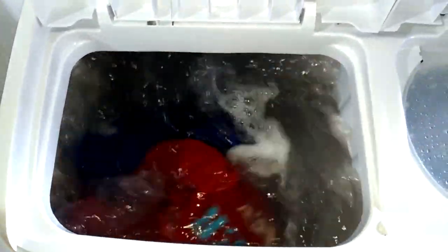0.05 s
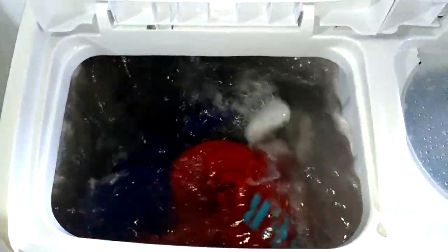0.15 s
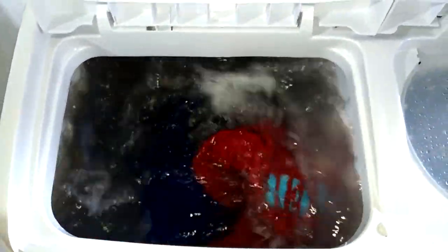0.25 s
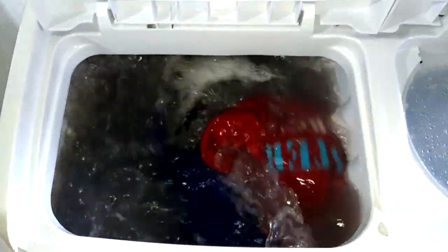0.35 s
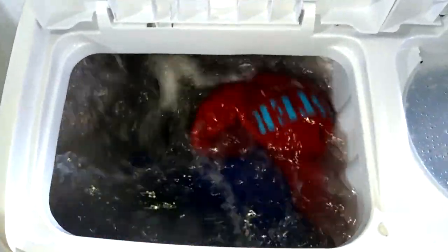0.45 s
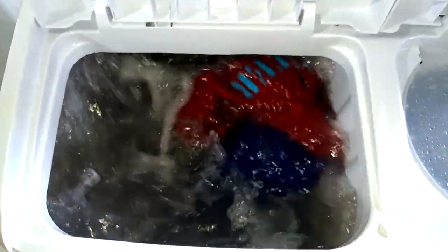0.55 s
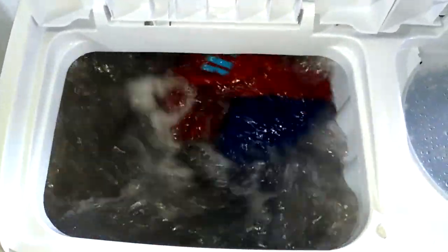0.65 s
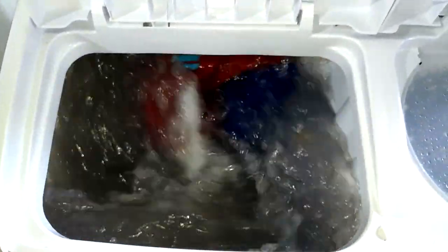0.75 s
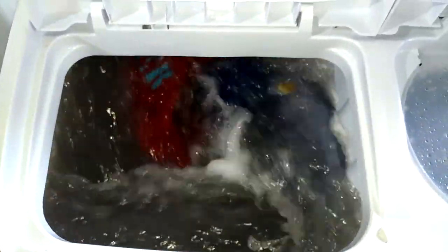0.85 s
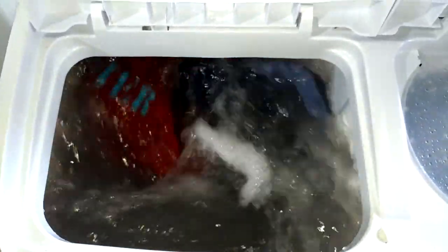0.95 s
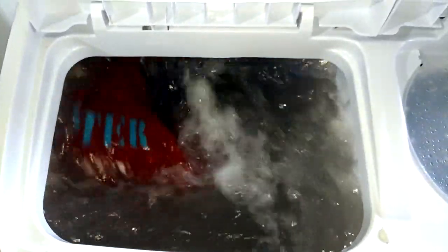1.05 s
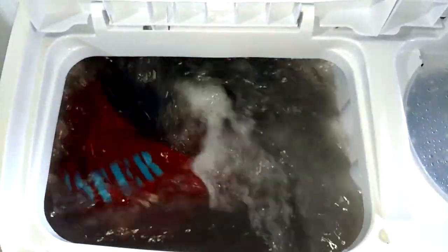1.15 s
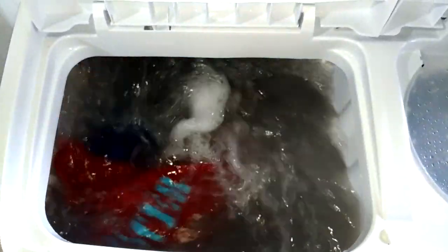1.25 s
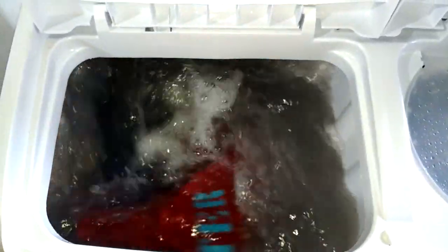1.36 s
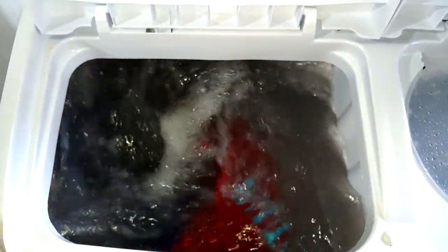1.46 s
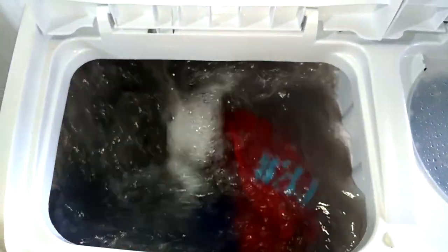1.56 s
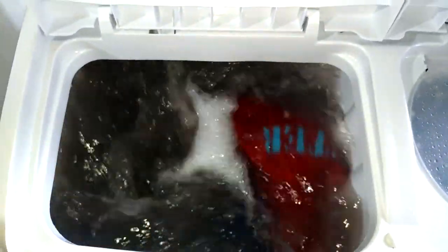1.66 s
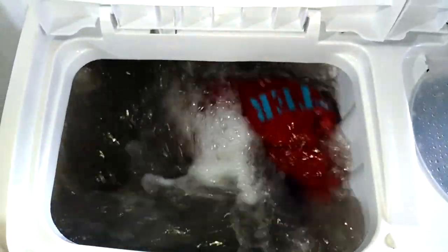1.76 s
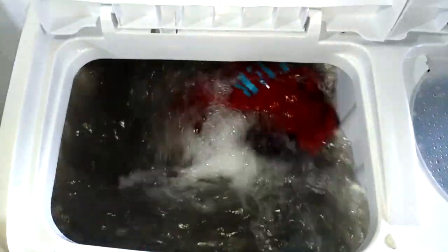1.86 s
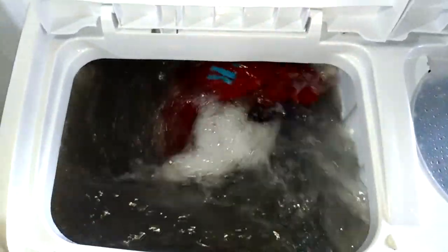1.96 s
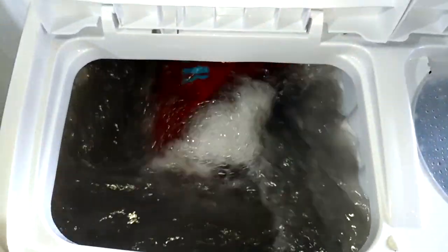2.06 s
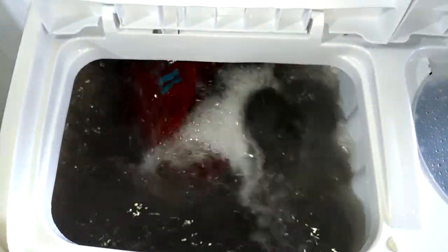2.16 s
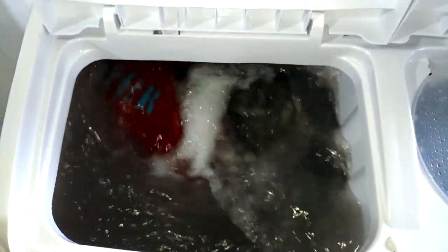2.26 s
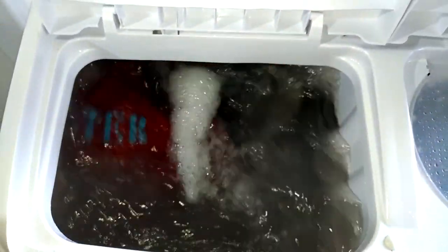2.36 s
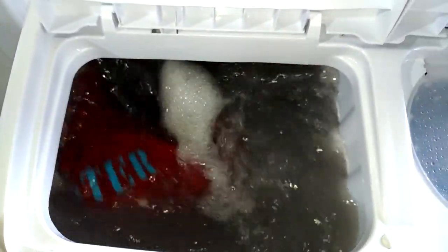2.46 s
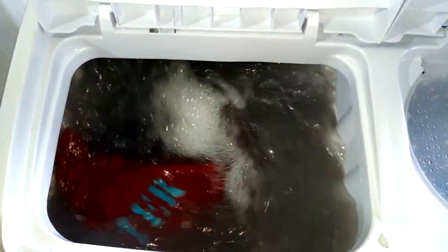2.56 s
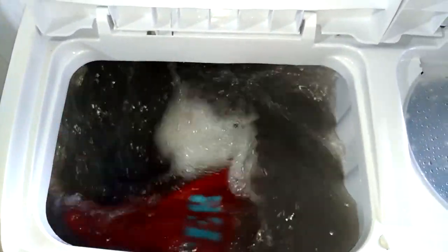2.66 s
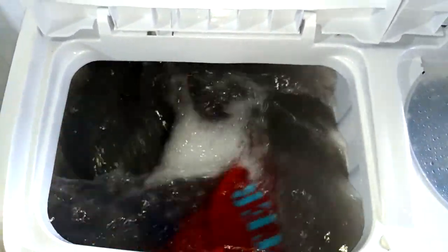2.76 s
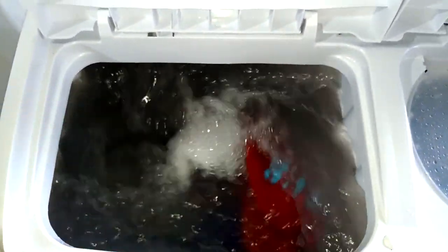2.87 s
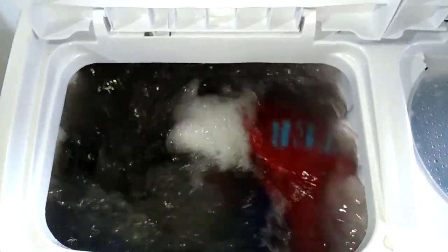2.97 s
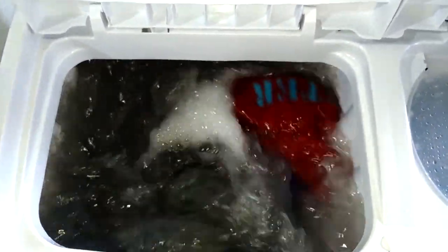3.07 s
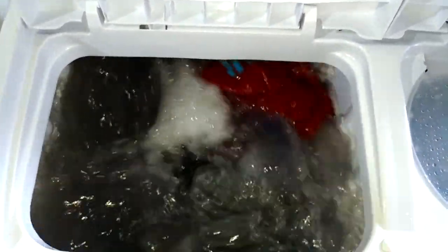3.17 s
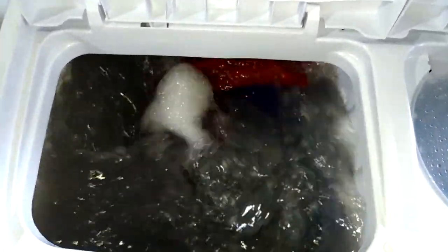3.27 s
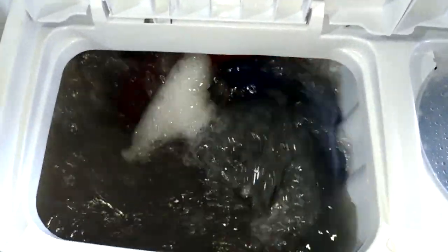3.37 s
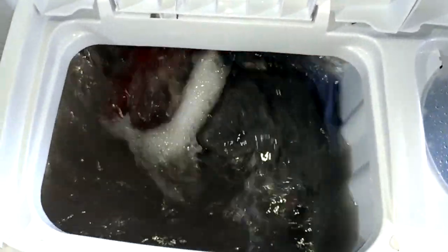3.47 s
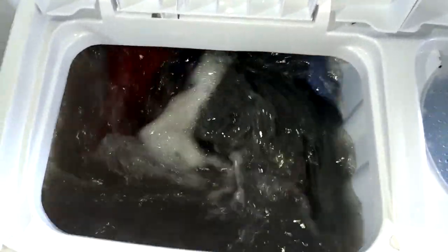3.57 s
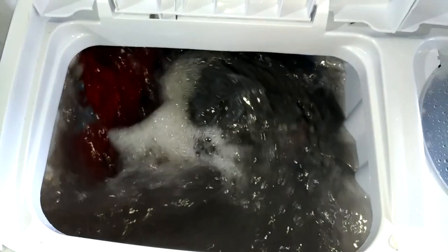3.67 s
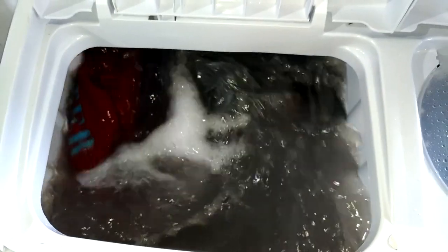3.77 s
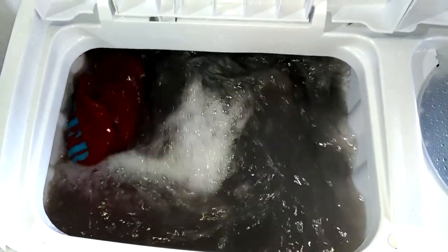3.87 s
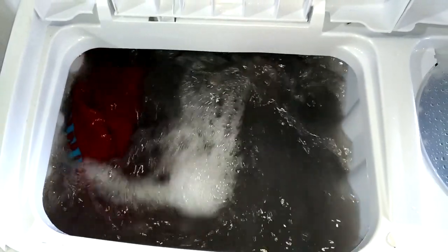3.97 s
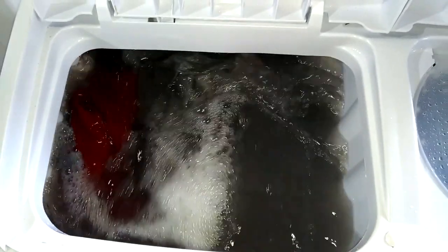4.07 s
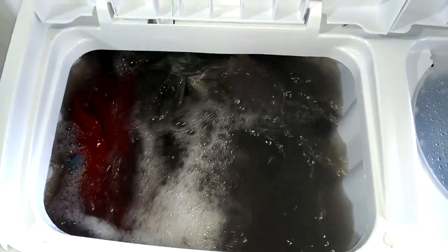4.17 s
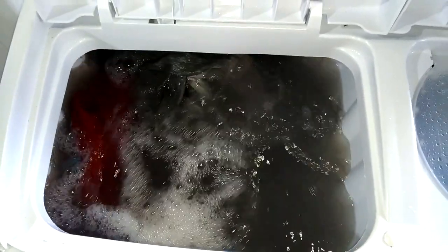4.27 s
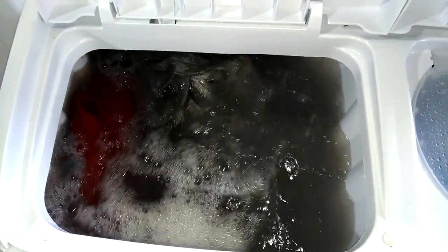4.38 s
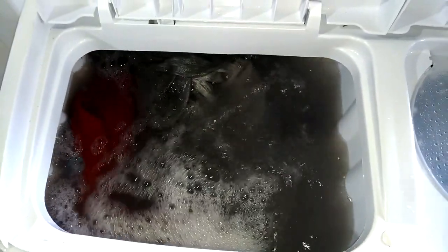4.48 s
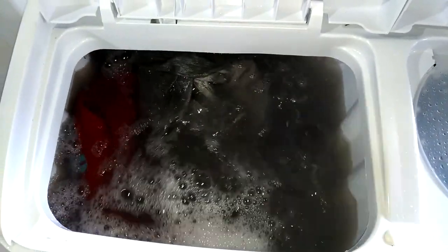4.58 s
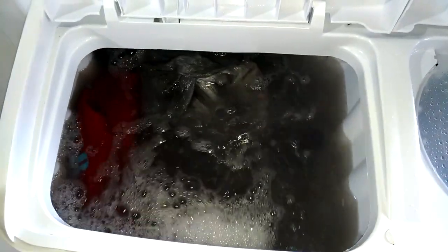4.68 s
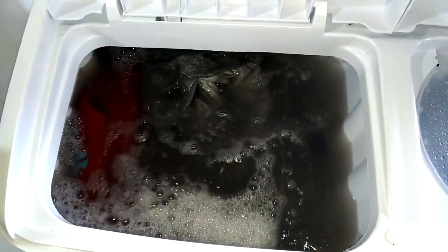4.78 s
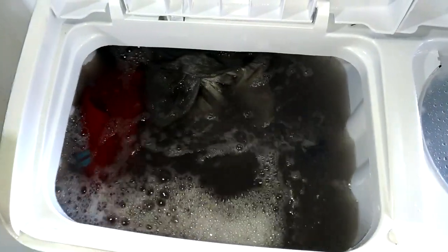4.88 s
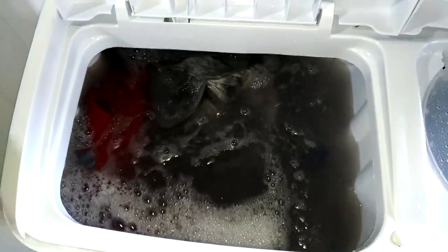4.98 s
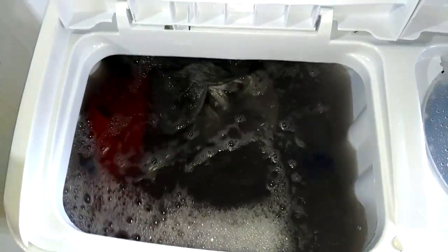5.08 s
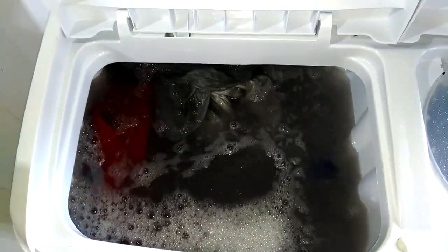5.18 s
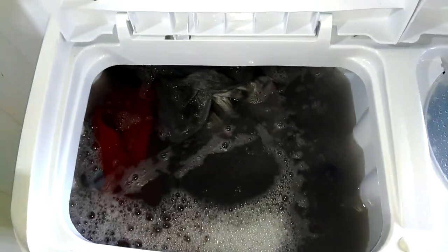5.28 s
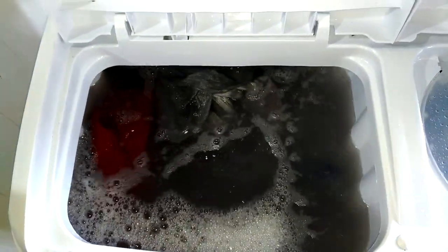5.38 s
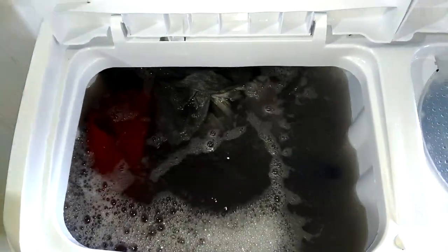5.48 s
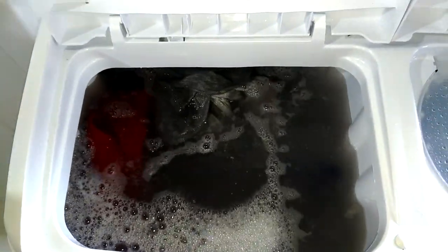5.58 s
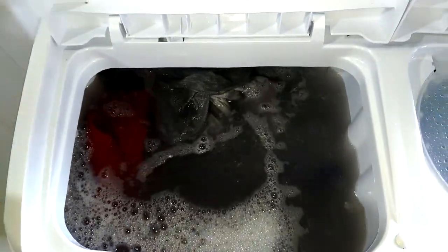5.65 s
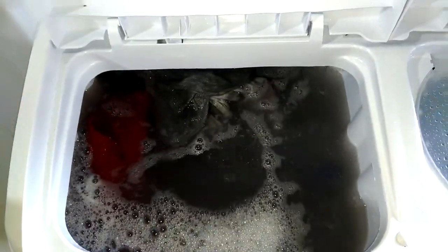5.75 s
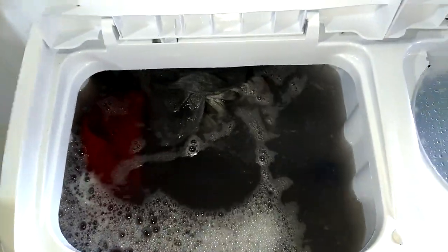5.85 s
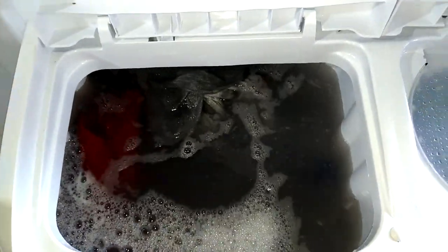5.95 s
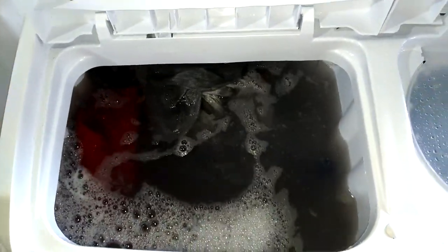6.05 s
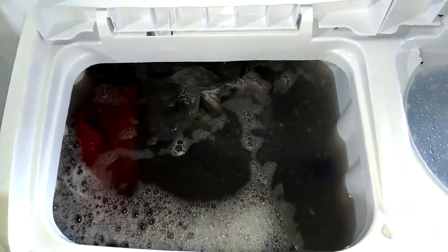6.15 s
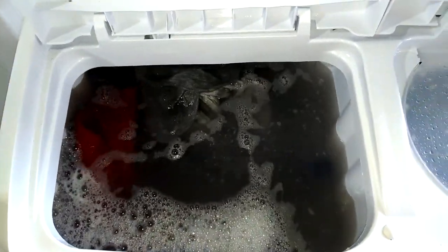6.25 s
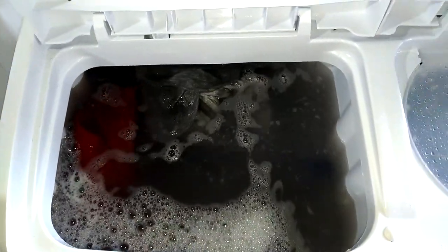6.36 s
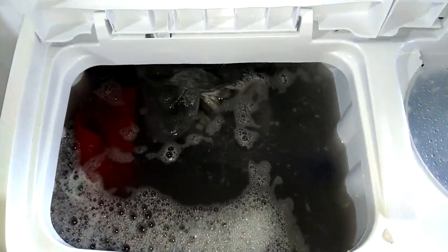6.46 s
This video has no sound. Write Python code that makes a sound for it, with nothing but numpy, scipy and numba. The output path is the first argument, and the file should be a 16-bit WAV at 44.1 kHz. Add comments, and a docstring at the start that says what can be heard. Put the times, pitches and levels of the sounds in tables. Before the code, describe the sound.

Close above an open twin-tub washer, a low motor hum and wavering gear growl run under churning clothes, with gurgles, glugs, plops and sharp splashes. Halfway through, the motor cuts out abruptly; one last lively slosh breaks and trickles into drips. Then suds fizz faintly and swish softly, while the spin basket beside it keeps droning in fast, regular pulses.

```python
"""A twin-tub washing machine, heard from just above the open wash tub.
From the start the wash motor hums (sines), its gear growls (a gliding tone) and the tub rumbles (noise).
Clothes churn the soapy water into gurgles, glugs and plops (rising sines) and splashes (short noise bursts).
The motor cuts out at 3.3 s, a last wave breaks and drips, and the suds fizz (tiny bubbles) and swish (noise).
The spin basket, there all along behind the water, keeps humming and droning in surges on every turn."""
import sys
import numpy as np
from scipy import signal
from scipy.fft import rfft, irfft
from scipy.io import wavfile
from scipy.ndimage import uniform_filter1d
from numba import njit

SR = 44100
rng = np.random.default_rng(int(sys.argv[2]) if len(sys.argv) > 2 else 0)


def wav_record(signal):
    """Record a signal, one row per channel, as 16-bit PCM in the file named by sys.argv[1]."""
    frames = np.transpose(np.atleast_2d(signal))
    bounded = np.clip(frames, -1, 1)
    # unit amplitude maps onto the largest positive 16-bit level
    quanta = np.round(bounded * 32767).astype(np.int16)
    wavfile.write(sys.argv[1], SR, quanta)


N = 287532
TIME = np.arange(N) / SR  # seconds


def from_db(db):
    """Turn decibels into a gain."""
    return 10 ** (np.asarray(db) / 20)


def rms_one(x):
    """Scale so that the mean of the channels has an rms (average strength) of 1."""
    middle = np.atleast_2d(x).mean(axis=0)
    return x / np.sqrt(np.mean(middle ** 2) + 1e-20)


def in_time(rows):
    """Read each column of a curve at every sample, joining its points by straight lines."""
    seconds, *columns = np.transpose(rows)
    return [np.interp(TIME, seconds, column) for column in columns]


def at_hz(points, hz):
    """Read a table of frequencies between its points, on a log-frequency axis."""
    table_hz, value = np.transpose(points)
    return np.interp(np.log(np.maximum(hz, 1)), np.log(table_hz), value)


def drift(corner_hz):
    """Random wandering with spread 1: noise smoothed above a corner frequency."""
    step = 40  # samples between the drawn points
    r = np.exp(-2 * np.pi * corner_hz * step / SR)
    drawn = rng.standard_normal(N // step + 2002)
    slow = signal.lfilter([1], [1, -2 * r, r * r], drawn)[2000:]
    return np.interp(np.arange(N) / step, np.arange(len(slow)), rms_one(slow))


def tone(hz):
    """A steady sine of rms 1."""
    return np.sqrt(2) * np.sin(2 * np.pi * hz * TIME)


def throb(per_s, depth):
    """A gain that swings about 1 at an unsteady rate."""
    rate = per_s * (1 + .25 * drift(4))
    return 1 + depth * np.sin(2 * np.pi * np.cumsum(rate) / SR)


def swells(rows):
    """Level of separate swells, each rising and falling as one smooth bell."""
    return sum(from_db(level_db) * np.exp(-np.pi * (1.136 * (TIME - top) / length) ** 2)
               for top, length, level_db in rows)


def spatter(per_s, t60, spread_db):
    """Level of many small slaps, each swelling within a few milliseconds and dying quickly; rms 1."""
    size_db = spread_db * np.minimum(rng.exponential(1, N), 3)
    slaps = (rng.random(N) < per_s / SR) * from_db(size_db)
    power = signal.lfilter([1], [1, -10 ** (-6 / (t60 * SR))], slaps ** 2 + 1e-18)
    return rms_one(np.sqrt(np.abs(uniform_filter1d(power, size=150))))


# How alike the two ears hear the noise.
# Each row: frequency in Hz, likeness (1 the same, 0 unrelated).
LEFT_RIGHT_LIKENESS = [(100, .96), (200, .97), (350, .9), (650, .62), (1300, .15), (2500, 0), (15000, 0)]


def noise(spectrum):
    """Stereo noise of one colour, falling steeply past its ends, alike in both ears in the bass."""
    hz = np.maximum(np.arange(N // 2 + 1) * SR / N, 1)
    mid, side = rfft(rng.standard_normal((2, N)))
    alike = np.clip(at_hz(LEFT_RIGHT_LIKENESS, hz), -1, 1)
    both = np.sqrt(1 + alike) * mid + np.sqrt(1 - alike) * side * [[1], [-1]]
    lowest, highest = spectrum[0][0], spectrum[-1][0]
    skirts = np.minimum(1, np.minimum(hz / lowest, highest / hz)) ** 4
    return rms_one(irfft(both * skirts * from_db(at_hz(spectrum, hz)), N))


@njit
def bubbles(start, height, hz, t60, rise, place):
    """Each bubble is a dying sine gliding by `rise` octaves; its place sets lag and level in each ear."""
    out = np.zeros((2, N))
    for k in range(len(start)):
        for ear in range(2):
            toward = place[k] * (1 - 2 * ear)  # a positive place is to the left
            first = int((start[k] - toward * .00015) * SR)
            phase, level, pitch = 0., height[k] * (1 + .3 * toward), hz[k]
            fade, climb = 10 ** (-3 / (t60[k] * SR)), 2 ** (rise[k] / (t60[k] * SR))
            for i in range(max(first, 0), min(first + int(t60[k] * SR), N)):
                phase += 2 * np.pi * pitch / SR
                onset = min((i - first) / (.001 * SR), 1.)  # fades in over 1 ms
                out[ear, i] += level * onset * np.sin(phase)
                level, pitch = level * fade, pitch * climb
    return out


def swarm(spectrum, count, cycles, rise, spread_db):
    """Bubbles of random time, pitch and size, each ringing for roughly `cycles` cycles; rms 1."""
    when, pitch, size, life, climb, place = rng.random((count, 6)).T
    lowest, highest = spectrum[0][0], spectrum[-1][0]
    hz = lowest * (highest / lowest) ** pitch
    size_db = spread_db * np.minimum(-np.log(size), 4)
    height = hz * from_db(at_hz(spectrum, hz) + size_db)
    t60 = cycles * (.5 + life) / hz
    return rms_one(bubbles(when * N / SR, height, hz, t60, 2 * rise * climb, 2 * place - 1))


def cloud(top, length, level_db, middle_hz, count, octaves, cycles):
    """Many bubbles of similar pitch burst together in one short swell."""
    when, pitch, size, place = rng.standard_normal((count, 4)).T
    start = top + length * (when / 4 - .1)
    hz = np.clip(middle_hz * 2 ** (pitch * octaves), 200, 15000)
    rise = np.full(count, .3)  # octaves
    burst = bubbles(start, from_db(2.5 * size), hz, cycles / hz, rise, np.tanh(place + .4))
    # spread the level over the short swell instead of the whole scene
    return from_db(level_db) * np.sqrt(length * SR / N / 2) * rms_one(burst)


# Load of the clothes on the motor. Each row: time in seconds, change in dB.
CLOTHES_LOAD = [(0, -5), (.55, 2.5), (.75, 0), (1.45, 2.5), (2.1, 1.5), (2.75, -2), (3.3, 0.5)]
# Weaker tones of the pulleys and belt. Each row: frequency in Hz, level in dB.
BELT_TONES = [(53.5, -58), (73.5, -51.5), (108, -47.5)]
# The gear tone wanders up and down in pitch. Each row: time in seconds, pitch in Hz.
GEAR_PITCH_CURVE = [(0.0, 177.7), (0.22, 187.3), (0.44, 187.2), (0.49, 195.1), (0.8, 185.1), (0.86, 191.3),
                    (1.25, 195.2), (1.34, 188.7), (1.55, 193.8), (1.74, 190.6), (1.87, 193.6),
                    (2.61, 189.3), (2.65, 181.1), (2.81, 181.4), (2.86, 186.5), (3.3, 195.0)]
# Clothes drag on the agitator and the gear tone swells.
# Each row: top of the swell in seconds, length in seconds, level in dB.
CLOTHES_DRAGS = [(.04, 0.3, -31.5), (.22, 0.075, -38), (.38, 0.27, -33.5), (.59, 0.083, -35),
                 (.86, 0.12, -30.5), (1.16, 0.16, -27.5), (1.3, 0.064, -30), (1.41, 0.056, -24),
                 (1.53, 0.14, -33.5), (1.74, .15, -30), (1.89, 0.16, -32), (2.07, 0.17, -27.5),
                 (2.33, 0.078, -30), (2.41, 0.064, -29), (2.54, 0.054, -26), (2.88, 0.11, -27),
                 (3.09, 0.053, -24.5), (3.26, 0.08, -34.5)]
# Colour of the tub's rumble. Each row: frequency in Hz, relative level in dB.
TUB_RUMBLE = [(45, -21), (62, -38), (82, -9), (100, -7), (150, -1.5), (170, -7), (205, -2), (250, -3),
              (295, -11), (340, -12.5), (390, -8.5), (480, -28.5), (640, -26.5)]
MOTOR_OFF_S, RUN_DOWN_DB_PER_S = 3.32, 196
HUM_HZ, HUM_DB, RUMBLE_DB = 120, -33.5, -33.5  # levels before the load changes them
GEAR_DB, GEAR_FLUTTER_DB = -37.5, 1  # between the swells
GEAR_OCTAVE_DB = -21.5  # relative to the gear tone


def wash_motor():
    """Mains hum, belt tones, a gear tone that swells as clothes drag, and the rumble of the full tub."""
    load_db, = in_time(CLOTHES_LOAD)
    running = from_db(-RUN_DOWN_DB_PER_S * np.maximum(TIME - MOTOR_OFF_S, 0))
    hum = from_db(HUM_DB + load_db + .82 * drift(36)) * tone(HUM_HZ)
    hum = hum * throb(per_s=10, depth=.12)
    belt = sum(from_db(level_db) * tone(hz) for hz, level_db in BELT_TONES)
    gear_hz, = in_time(GEAR_PITCH_CURVE)
    turn = 2 * np.pi * np.cumsum(gear_hz) / SR + .15 * drift(14)
    mesh = np.sqrt(2) * (np.sin(turn) + from_db(GEAR_OCTAVE_DB) * np.sin(2 * turn))
    gear_level = np.hypot(from_db(GEAR_DB + GEAR_FLUTTER_DB * drift(17)), swells(CLOTHES_DRAGS))
    gear = gear_level * mesh * throb(per_s=14, depth=.3)
    rumble = from_db(RUMBLE_DB + .66 * load_db + 1.75 * drift(24)) * noise(TUB_RUMBLE)
    return running * (hum + belt + gear + rumble)


# Speed of the basket. Each row: time in seconds, turns per second.
BASKET_SPEED = [(4.2, 15.6), (4.5, 16.1), (4.75, 17.3), (4.9, 16.7), (5.1, 15.2), (5.27, 16.6),
                (5.5, 16.75), (5.8, 17.45), (6.1, 17.8), (6.35, 17.35)]
# Mains hum of the spin motor. Each row: frequency in Hz, level in dB.
SPIN_MOTOR_HUM = [(60, -59), (120, -47), (480, -68), (600, -65)]
# The cabinet drones in surges during each turn of the basket.
# Each row: top as a share of the turn, length in turns, frequency in Hz, level in dB before the growth below.
DRONE_SURGES = [(.2, 0.18, 296, -42), (0.44, 0.15, 365, -47.5), (0.46, 0.2, 418, -47.5),
                (0.6, 0.12, 268, -46.5), (0.65, 0.15, 640, -61), (0.21, .3, 555, -57.5)]
# The drone grows as the basket gathers speed. Each row: time in seconds, change in dB.
DRONE_GROWTH = [(4.1, -2.5), (5.2, -1), (6.3, 1.5)]
TURN_STARTS_S = 5.176  # a turn begins at this moment


def spin_basket():
    """The spin motor hums, and its unbalanced basket makes the cabinet drone in the same surges every turn."""
    turns_per_s, = in_time(BASKET_SPEED)
    turns = np.cumsum(turns_per_s) / SR
    turns -= np.interp(TURN_STARTS_S, TIME, turns)
    growth_db, = in_time(DRONE_GROWTH)
    out = sum(from_db(level_db) * tone(hz) for hz, level_db in SPIN_MOTOR_HUM)
    for share, length, hz, level_db in DRONE_SURGES:
        from_top = (turns - share + .5) % 1 - .5  # in turns
        surge = from_db(level_db + growth_db) * np.exp(-np.pi * (from_top / length) ** 2 / 2)
        drone = np.sqrt(2) * np.sin(2 * np.pi * hz * TIME + .7 * drift(12))
        out = out + surge * drone
    return out


# Colour of the cabinet's rush. Each row: frequency in Hz, relative level in dB.
CABINET_COLOUR = [(45, -13), (58, -2.5), (85, -5.5), (125, -11.5), (150, -2), (200, -10.5), (300, -11),
                  (430, -16), (600, -16.5), (700, -21), (950, -21), (1500, -28), (2400, -29), (4500, -37),
                  (8500, -36), (10000, -46.5), (15500, -41.5)]


def cabinet_rush():
    """The steady rush of the cabinet is noise at one level."""
    return from_db(-44.5) * noise(CABINET_COLOUR)


# Churning of the water, dying away at the end.
# Each row: time in seconds, gurgle in dB, spray in dB (both before the trims below).
CHURNING = [(0, -43.5, -40.5), (.2, -43, -42), (.6, -37.5, -40), (.88, -49, -43.5), (1.1, -38.5, -40),
            (1.38, -46, -43.5), (1.9, -45, -43.5), (2.1, -48, -53.5), (2.4, -50.5, -45.5),
            (2.62, -50, -48.5), (2.85, -50.5, -46), (3.15, -44.5, -44.5), (3.6, -40, -37),
            (3.8, -53, -46.5), (4.08, -57, -58), (4.5, -100, -61)]
# Waves fold over and slosh.
# Each row: top of the swell in seconds, length in seconds, level in dB before the trims.
WAVE_SLOSHES = [(.36, 0.083, -58), (.5, 0.23, -43), (.71, 0.2, -40), (1.02, 0.05, -47), (1.21, 0.12, -42.5),
                (1.52, 0.13, -42), (1.7, 0.12, -44.5), (1.98, 0.19, -42.5), (2.21, 0.11, -45.5),
                (3.02, 0.15, -52.5), (3.29, 0.13, -42), (3.55, 0.2, -38.5), (3.99, 0.062, -51.5)]
# A crest collapses into a burst of bubbles.
# Each row: middle of the burst in seconds (roughly), length in seconds, level in dB, middle pitch in Hz.
CREST_BURSTS = [(.357, .025, -47, 2220), (0.415, 0.026, -37.5, 1120), (0.484, 0.045, -36, 1080),
                (.578, 0.032, -48, 1500), (.583, 0.029, -39, 4040), (0.682, 0.011, -29, 2740),
                (1.117, 0.033, -43, 2460), (1.683, .04, -44, 2220), (2.24, 0.028, -44.5, 2900),
                (2.998, 0.019, -37, 1506), (3.13, 0.034, -49, 2420), (3.249, 0.023, -41, 1920),
                (3.472, 0.035, -35, 1470), (3.506, .014, -28, 3980), (3.532, 0.017, -36, 3070),
                (3.581, 0.026, -33, 1154), (3.596, 0.014, -33.5, 1160), (3.599, .018, -38, 3020),
                (3.626, 0.025, -38, 1200), (3.653, 0.013, -39, 990), (3.677, 0.022, -36, 3180)]
# Colours of the gurgle, the spray, and the droplets ticking on the surface.
# Each row: frequency in Hz, relative level in dB.
GURGLE_COLOUR = [(420, -4), (600, -4), (880, -4.5), (1130, -9), (1400, -0.5), (1800, -16), (2600, -17)]
SPRAY_COLOUR = [(1700, -3.5), (2500, -0.5), (3400, -4.5), (4400, -6.5), (5500, -7.5), (8300, -7.5),
                (10000, -14.5), (12500, -18), (15500, -20)]
TICK_COLOUR = [(2500, 2), (5000, 0), (9000, -4), (12500, -13)]
GURGLE_TRIM_DB, SPRAY_TRIM_DB, SLOSH_SPRAY_DB = -3.5, -3, 2
GURGLE_RUSH, SPRAY_RUSH = .42, .68  # gain of the noise thrown up with the bubbles
BLOOP_SHARE = .25  # gain of the sparse, long-ringing bubbles
TICKS_DB = -10  # relative to the spray


def churn():
    """Folding water traps air that gurgles; its crests spatter and burst into fine droplets."""
    gurgle_db, spray_db = in_time(CHURNING)
    slosh = swells(WAVE_SLOSHES)
    slaps = spatter(per_s=260, t60=.05, spread_db=3.6)
    pockets = swarm(GURGLE_COLOUR, count=1700, cycles=30, rise=.6, spread_db=1.5)
    bloops = swarm(GURGLE_COLOUR, count=230, cycles=85, rise=.8, spread_db=1)
    droplets = swarm(SPRAY_COLOUR, count=9000, cycles=42, rise=.2, spread_db=2.3)
    ticks = swarm(TICK_COLOUR, count=600, cycles=16, rise=.1, spread_db=3.3)
    # a slap throws up more droplets, and a rush of noise with them
    gurgle = pockets + BLOOP_SHARE * bloops + GURGLE_RUSH * slaps * noise(GURGLE_COLOUR)
    spray = np.sqrt(slaps) * droplets + SPRAY_RUSH * slaps * noise(SPRAY_COLOUR)
    spray = spray + from_db(TICKS_DB) * ticks
    gurgle_level = from_db(GURGLE_TRIM_DB) * np.hypot(from_db(gurgle_db), slosh)
    spray_level = from_db(SPRAY_TRIM_DB) * np.hypot(from_db(spray_db), from_db(SLOSH_SPRAY_DB) * slosh)
    bursts = sum(cloud(*row, count=18, octaves=.32, cycles=24) for row in CREST_BURSTS)
    return bursts + gurgle_level * gurgle + spray_level * spray


# The water rocks and patches of foam fizz up.
# Each row: middle of the swell in seconds (roughly), length in seconds, level in dB, middle pitch in Hz.
FOAM_PATCHES = [(4.115, 0.073, -57.5, 3240), (4.322, 0.16, -55, 4000), (4.441, 0.11, -60, 5000),
                (4.677, 0.14, -64, 3480), (4.922, 0.29, -59, 4960), (5.283, 0.14, -60, 2420),
                (5.439, .14, -61, 5300), (5.629, .1, -67, 3300), (5.774, 0.13, -57, 2480),
                (6.266, 0.063, -55, 5500), (6.452, 0.044, -62, 5000)]


def foam_fizz():
    """Suds fizz as a faint steady swarm of tiny bubbles, with patches that flare up."""
    patches = sum(cloud(*row, count=400, octaves=.6, cycles=24) for row in FOAM_PATCHES)
    steady = swarm(SPRAY_COLOUR, count=7000, cycles=60, rise=.18, spread_db=3.5)
    return patches + from_db(-73.5) * steady


# Air squeezed through the cloth swells into a gliding glug.
# Each row: top in seconds, time from silence to top in seconds, level in dB before the flutter,
# pitch at the top in Hz, glide in octaves per second.
CLOTH_GLUGS = [(0.038, 0.033, -31, 1440, 15.5), (.145, 0.03, -30, 898, 11.5), (0.217, 0.039, -35.5, 890, 8),
               (0.291, .025, -30, 595, 9.5), (0.311, .022, -33, 738, 17), (0.322, 0.023, -31, 1470, 9.5),
               (0.493, .025, -32.5, 558, 0), (0.646, 0.044, -33, 1273, 3), (0.756, .02, -36, 690, 8),
               (.905, 0.026, -39, 1365, 9.5), (0.934, .02, -38, 1580, 7), (1.21, .025, -38, 1550, 8),
               (1.274, 0.053, -35, 816, 7.5), (1.492, 0.033, -43, 1020, 5), (1.579, 0.036, -40, 860, 2.5),
               (2.03, 0.035, -41, 845, 3), (2.487, 0.04, -40.5, 1342, 10), (2.587, 0.028, -42, 1290, 6),
               (2.741, 0.03, -42, 1280, 7), (3.067, 0.044, -33.5, 1273, 22),
               (3.268, 0.02, -28.5, 1450, 10.5), (3.43, 0.014, -29, 623, -3.5), (3.51, 0.026, -28, 337, -6),
               (3.545, 0.016, -24.5, 390, 6)]


def glugs():
    """Each glug swells and fades, fluttering, as its pitch glides; it reaches the left ear a little earlier."""
    out = np.zeros((2, N))
    flutter, wobble = from_db(3 * drift(90)), .035 * drift(90)
    leads = rng.uniform(0, .00012, len(CLOTH_GLUGS))  # seconds
    for (top, length, level_db, hz, glide), lead in zip(CLOTH_GLUGS, leads):
        near = slice(max(int((top - length) * SR), 0), int((top + length) * SR))
        t = TIME[near] - top
        pitch = hz * 2 ** (glide * t + wobble[near])
        cycles = np.cumsum(pitch) / SR + pitch * lead * [[1], [-1]]
        swell = np.cos(np.pi / 2 * t / length) ** 6
        out[:, near] += from_db(level_db) * flutter[near] * swell * np.sin(2 * np.pi * cycles)
    return out


# Slaps of water and wet cloth.
# Each row: start in seconds, level in dB before a 9 dB cut, frequency in Hz near the top of its band,
# time in seconds to die by 60 dB.
WATER_SLAPS = [(0.015, -42, 2160, 0.02), (0.12, -22, 3300, 0.017), (0.214, -30, 12000, .014),
               (0.31, -15, 5000, 0.013), (.405, -28, 1200, 0.033), (1.109, -24, 2600, 0.024),
               (0.354, -19.5, 2290, 0.021), (0.474, -23, 2760, 0.061), (.491, -22.5, 5030, 0.083),
               (0.573, -21, 4200, 0.032), (.607, -9.5, 7500, 0.0065), (.66, -16, 6700, 0.018),
               (0.676, -13.5, 2930, 0.033), (0.994, -29, 3920, 0.26), (1.319, -20, 3730, 0.037),
               (1.473, -21, 6300, 0.019), (1.548, -31, 7200, 0.14), (1.99, -14.5, 7380, 0.0094),
               (2.131, -26.5, 9050, 0.03), (2.133, -25, 3220, 0.063), (2.204, -21, 6420, 0.011),
               (2.509, -21, 5070, 0.009), (2.536, -19.5, 3960, 0.018), (2.717, -27, 5800, 0.045),
               (2.796, -27, 7300, 0.026), (3.043, -31, 6013, 0.015), (3.075, -34, 8220, 0.028),
               (3.433, -23.5, 6270, 0.04), (3.503, -24.5, 4450, 0.065), (3.534, -27, 3520, 0.031),
               (3.558, -23, 5740, 0.013), (3.622, -21, 5000, 0.014), (3.754, -32, 6500, 0.036),
               (3.804, -27, 3600, 0.045), (3.82, -20, 8200, 0.011), (3.874, -31, 4100, 0.021),
               (3.931, -38, 9000, .02), (3.953, -35, 5000, .03), (4.001, -50, 5000, 0.018),
               (4.21, -30, 4630, 0.083), (4.417, -41.5, 8000, .02)]


def splashes():
    """Each slap is a crack of filtered noise followed by a softer tail as the drops fall back."""
    out, t = np.zeros((2, N)), TIME[:SR // 8]
    swell = 1 - np.exp(-t / .00064)
    for start, level_db, hz, t60 in WATER_SLAPS:
        edges = [hz / 1.62, min(hz * 1.13, SR / 2 - 1000)]
        band = signal.butter(1, edges, "band", fs=SR, output="sos")
        burst = rms_one(signal.sosfilt(band, rng.standard_normal((2, len(t)))))
        crack = 10 ** (-3 * t / t60)
        tail = from_db(-20) * 10 ** (-3 * t / (4 * t60))
        at = max(round(start * SR), 0)
        out[:, at:at + len(t)] += from_db(level_db - 9) * burst * swell * (crack + tail)
    return out


# Single air pockets, from glugs to drips.
# Each row: start in seconds, level in dB, pitch in Hz, time in seconds to die by 60 dB.
AIR_POCKETS = [(0.061, -31, 900, 0.083), (0.272, -15.5, 430, 0.034), (.273, -20, 2110, 0.046),
               (0.336, -23, 2500, .025), (.406, -23, 954, 0.034), (0.476, -30, 1010, 0.034),
               (0.504, -28, 1310, 0.044), (.575, -29, 2070, .025), (.589, -22, 4170, .018),
               (0.68, -10, 2840, .014), (1.109, -17, 2580, 0.015), (1.197, -26, 3200, 0.022),
               (1.32, -13.5, 3595, 0.012), (1.479, -22.5, 380, 0.03), (1.505, -24, 2090, 0.025),
               (1.546, -29.5, 404, 0.087), (1.735, -21.5, 2220, 0.018), (1.744, -33, 1525, 0.039),
               (1.818, -28, 2154, 0.027), (1.873, -27, 2510, 0.029), (2.128, -21, 334.6, 0.043),
               (2.169, -15, 3240, 0.019), (2.539, -18, 3680, 0.0099), (2.575, -27, 437, 0.13),
               (2.623, -36, 902, 0.076), (2.997, -25, 423, 0.061), (3.043, -20.5, 640, 0.055),
               (3.111, -23.5, 2447, 0.019), (3.183, -29.5, 2864, 0.04), (3.298, -22.5, 342, 0.087),
               (3.3, -26, 2354, 0.029), (3.418, -16, 826, 0.026), (3.434, -39, 2490, 0.033),
               (3.461, -24, 2710, 0.03), (3.504, -14, 4350, 0.014), (3.537, -27, 1900, 0.027),
               (3.573, -25.5, 832, 0.036), (3.583, -22.5, 915, 0.039), (3.68, -31, 2790, .025),
               (3.718, -29.5, 1240, 0.064), (3.803, -42, 767, 0.15), (3.872, -29.5, 895, 0.027),
               (3.933, -32.5, 1250, 0.032), (3.955, -31.5, 2930, .022), (4.004, -34, 2450, 0.028),
               (4.017, -36.5, 985, 0.031), (4.042, -37, 3200, .014), (4.107, -37.5, 2360, .025),
               (4.122, -42, 2780, .018), (4.168, -41, 3700, .016), (4.25, -35, 2520, .016),
               (4.313, -37, 2320, 0.027), (4.345, -49, 5540, .09), (4.711, -40.5, 2350, .025),
               (4.725, -32.5, 474, 0.041), (5.938, -47, 1316, 0.2), (6.005, -53.5, 4260, 0.16)]
PLOP_RISE_PER_S = 5.14  # octaves per second at the mean churning
RISE_FOLLOWS = .77  # dB of rise rate per dB of gurgle


def plops():
    """Pockets of air escape from the folds of the clothes, rising faster where the water is livelier."""
    start, level_db, hz, t60 = np.transpose(AIR_POCKETS)
    when, gurgle_db, _ = np.transpose(CHURNING)
    livelier_db = np.interp(start, when, gurgle_db) - gurgle_db.mean()
    rise_per_s = PLOP_RISE_PER_S * from_db(RISE_FOLLOWS * livelier_db)
    t60 = np.maximum(t60, .005)
    place = rng.uniform(-.3, 1, len(start))  # mostly to the left
    return bubbles(start, from_db(level_db), hz, t60, rise_per_s * t60, place)


# The clothes settle and the suds swish.
# Each row: top of the swell in seconds, length in seconds, level in dB.
SUDS_SWISHES = [(4.54, 0.06, -61), (4.7, .1, -55.5), (5.015, 0.062, -51), (5.43, 0.069, -57),
                (5.99, 0.088, -57), (6.258, 0.053, -46.5), (6.295, 0.11, -50.5)]
# Colour of the swish. Each row: frequency in Hz, relative level in dB.
SWISH_COLOUR = [(700, 5), (1200, 9.5), (2500, 3.5), (4000, -4), (8000, -11), (12000, -47)]


def suds_swish():
    """Suds swish as the clothes settle: spattering noise in short swells."""
    return swells(SUDS_SWISHES) * spatter(per_s=570, t60=.034, spread_db=1.5) * noise(SWISH_COLOUR)


def tub(x, t60, wet_db):
    """The plastic walls throw the shorter waves back and forth, differently to each ear."""
    t = TIME[:SR // 4]
    echoes = rng.standard_normal((2, len(t))) * 10 ** (-3 * t / t60) * (t > .001)
    echoes = signal.sosfilt(signal.butter(2, 700, "high", fs=SR, output="sos"), echoes)
    echoes /= np.sqrt(np.sum(echoes ** 2, axis=1, keepdims=True))
    return x + from_db(wet_db) * signal.fftconvolve(x, echoes, axes=1)[:, :N]


def scene():
    """The water echoes inside the tub; the machine and the foam are added without those echoes."""
    water = tub(churn() + glugs() + splashes() + plops(), t60=.1, wet_db=-7)
    machine = wash_motor() + spin_basket() + cabinet_rush()
    foam = foam_fizz() + suds_swish()
    return (water + machine + foam) * np.minimum(TIME / .01, 1)  # 10 ms fade-in


# Tone balance between the ears. Each row: frequency in Hz, left above right in dB.
LEFT_OVER_RIGHT = [(150, 0.5), (270, 2), (450, -1.5), (620, 2), (820, 1), (1100, 0), (1470, 3), (1960, -4),
                   (2620, -7.5), (3510, -2.5), (6300, -3.5), (8400, -7.5), (11200, 5), (15000, 5.5)]
CUTOFF_HZ = 15900


def record(dry):
    """Left and right are coloured in opposite directions; the highest treble is cut."""
    lean_db = at_hz(LEFT_OVER_RIGHT, np.arange(N // 2 + 1) * SR / N)
    coloured = irfft(rfft(dry) * from_db(lean_db * [[.5], [-.5]]), N)
    return signal.sosfilt(signal.ellip(12, .2, 80, CUTOFF_HZ, fs=SR, output="sos"), coloured)


dry = scene()
out = record(dry)
wav_record(out)
```